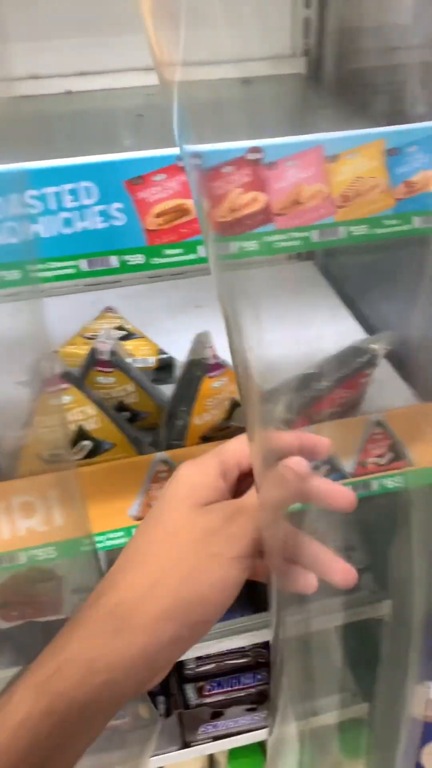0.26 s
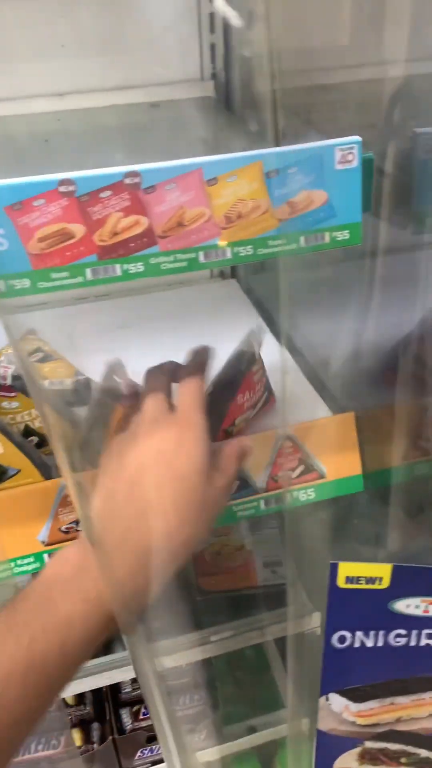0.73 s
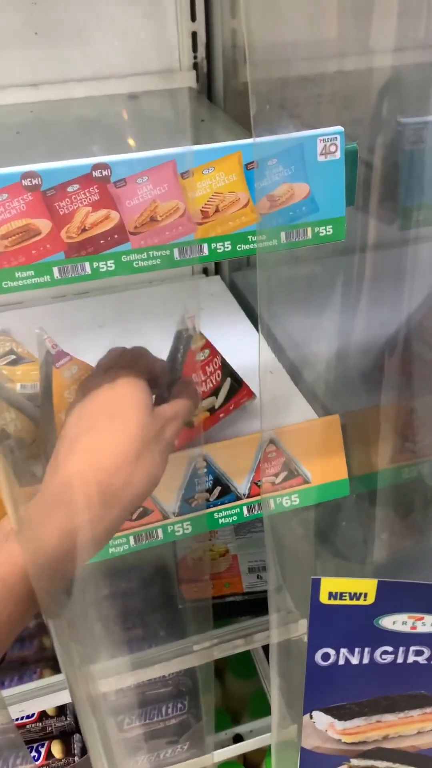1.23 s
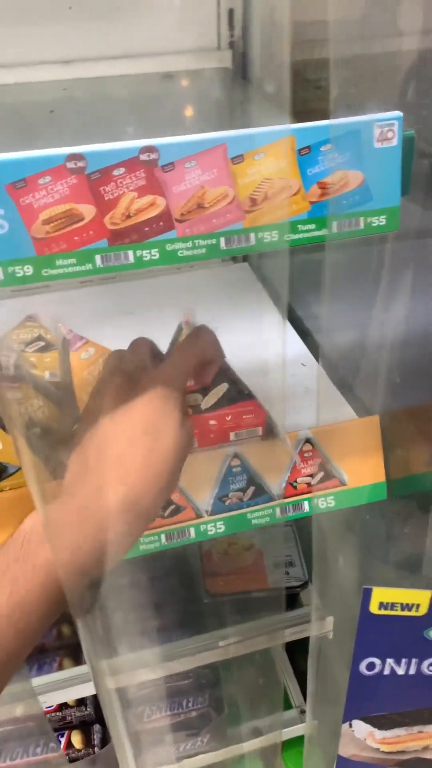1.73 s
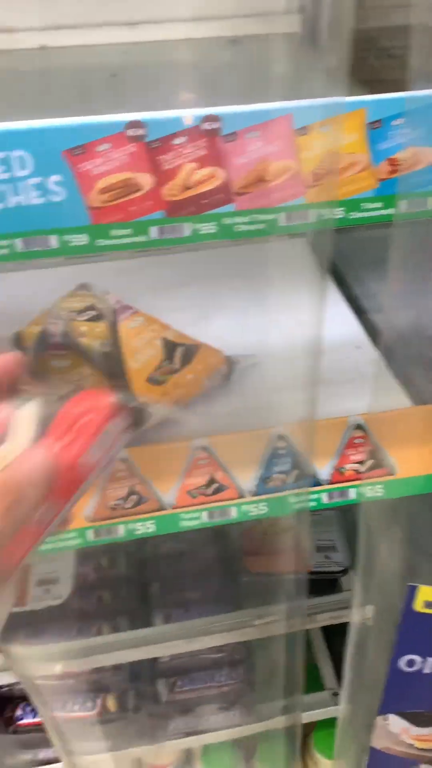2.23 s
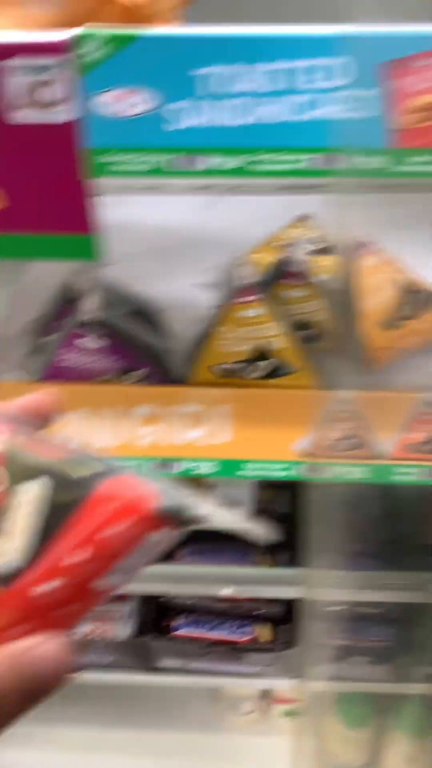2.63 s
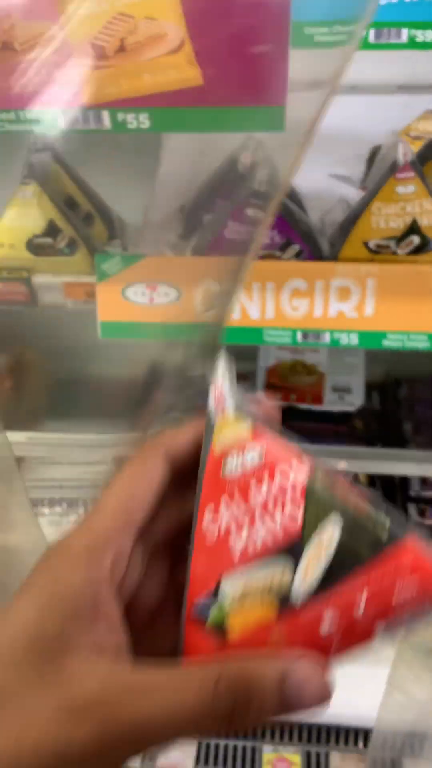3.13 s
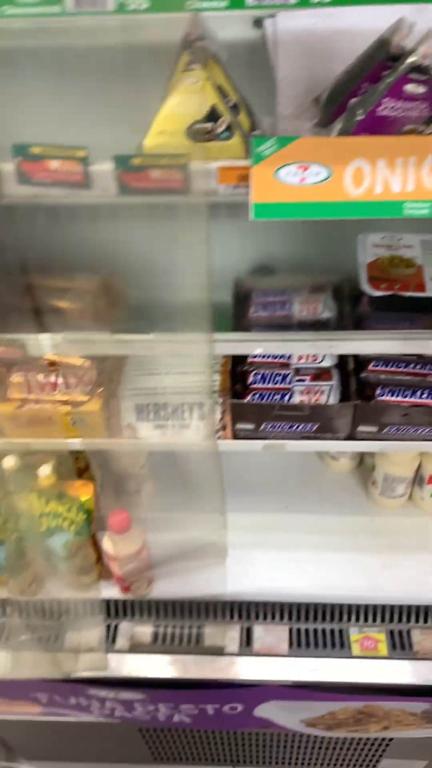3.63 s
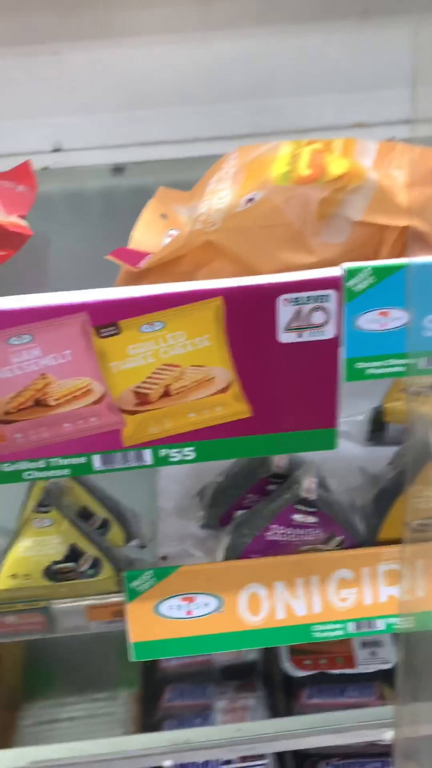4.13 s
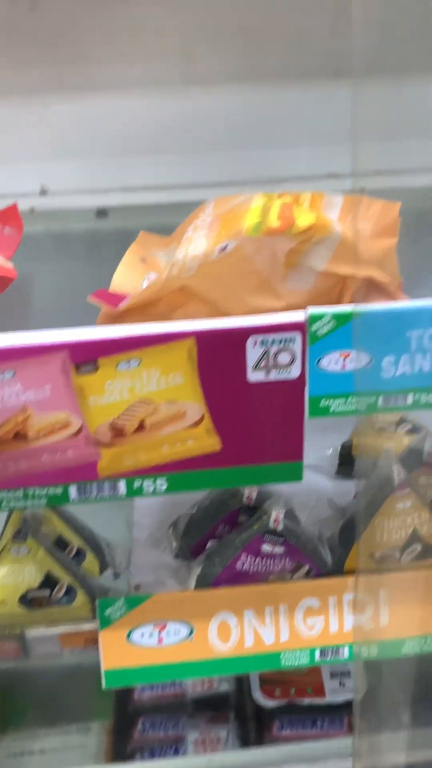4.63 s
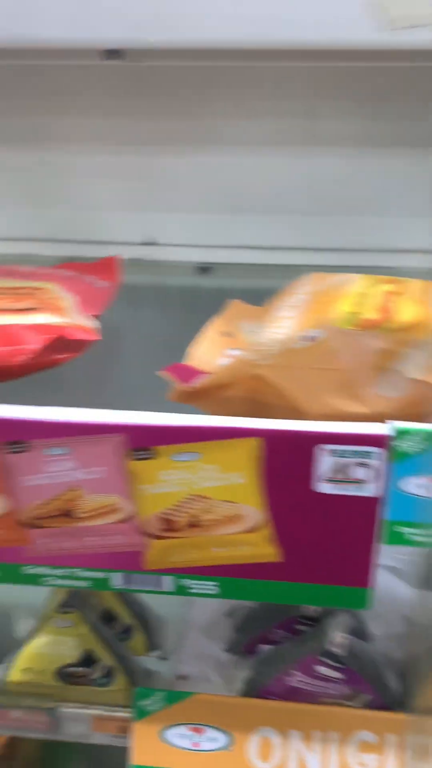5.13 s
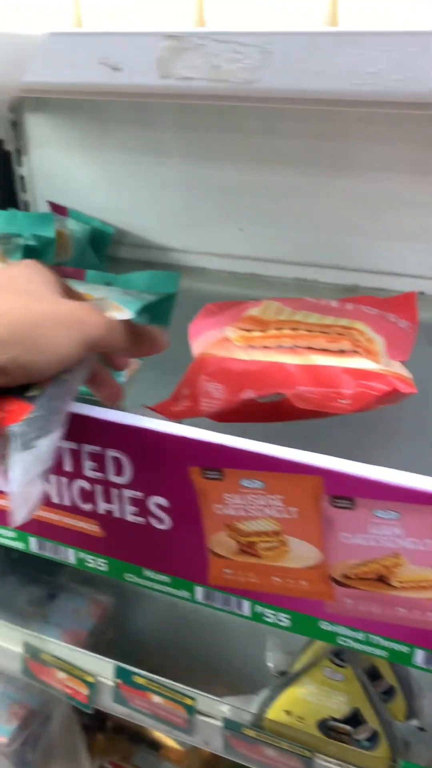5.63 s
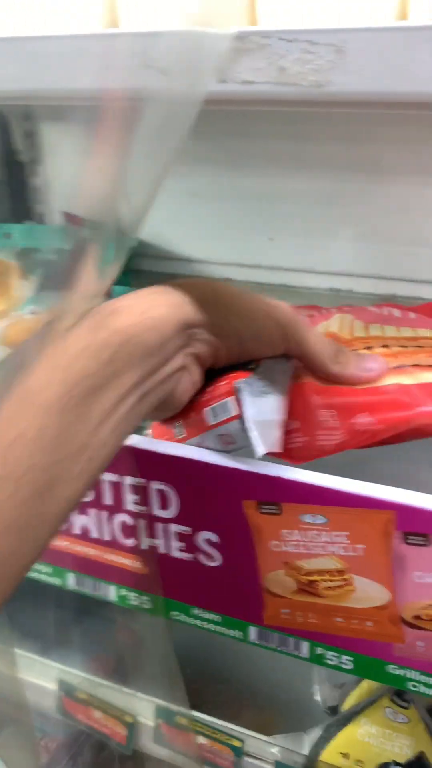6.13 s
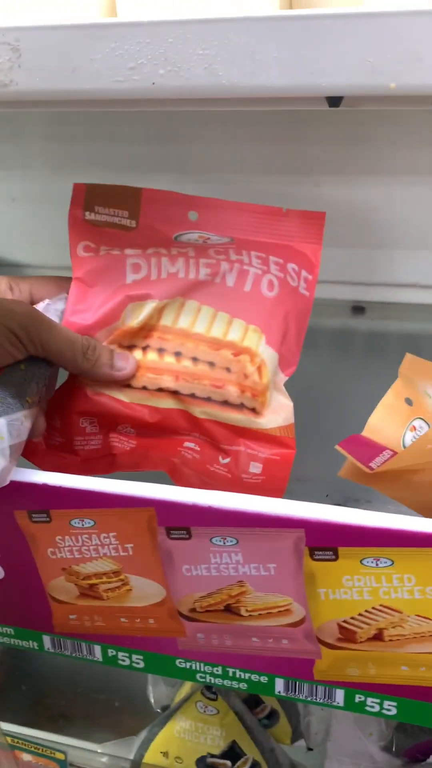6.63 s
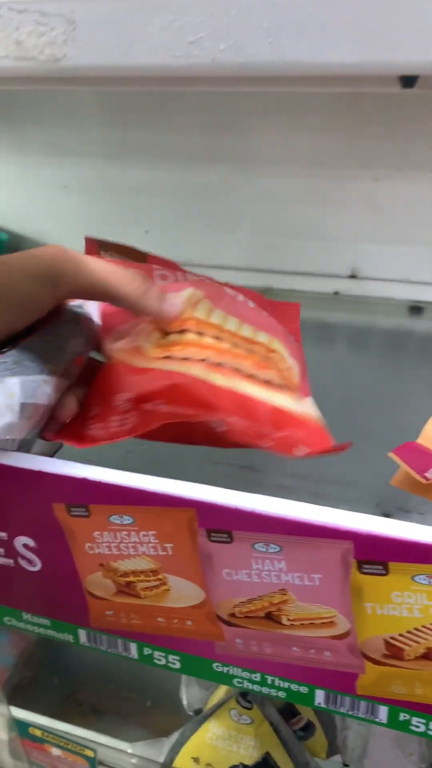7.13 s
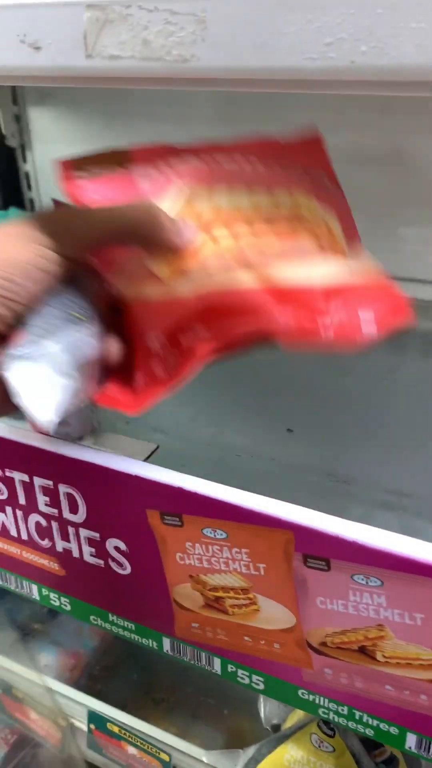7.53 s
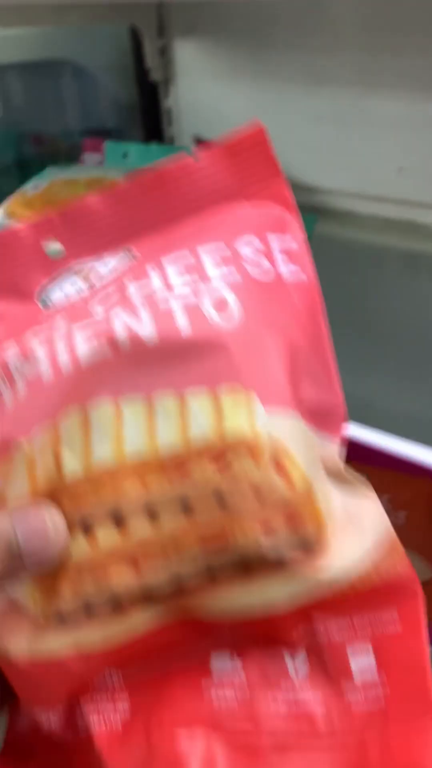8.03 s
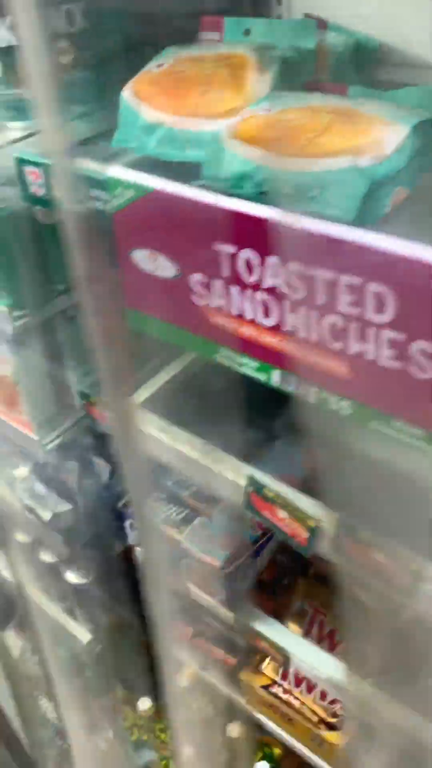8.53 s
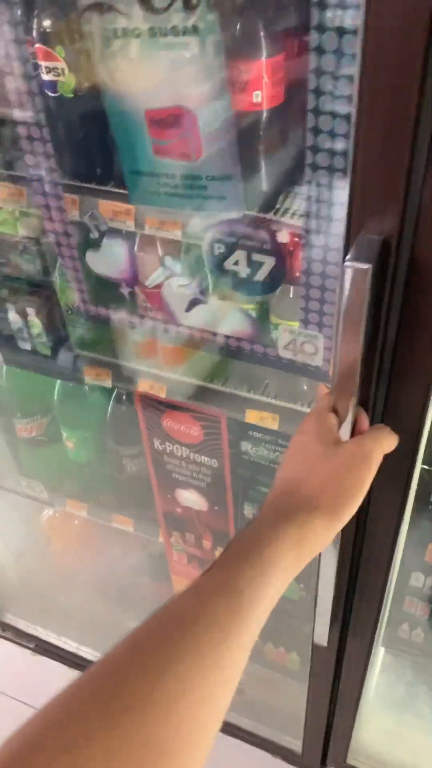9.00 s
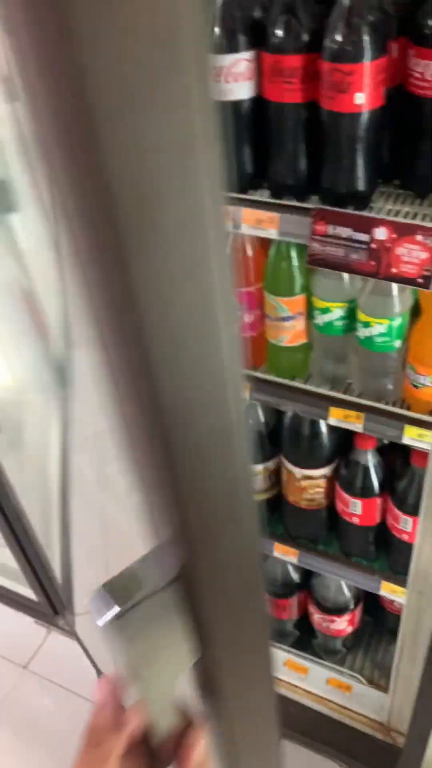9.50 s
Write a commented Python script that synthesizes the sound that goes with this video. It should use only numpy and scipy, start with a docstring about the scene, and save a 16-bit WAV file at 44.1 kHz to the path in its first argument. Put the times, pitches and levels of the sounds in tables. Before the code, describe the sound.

Plastic food packaging rustles and crackles in a hand over the steady fan noise and low hum of refrigerated shop displays.

```python
"""Open display coolers in a shop: fans rush, compressors hum at twice the mains, a faint whine above.
A hand reaches through a curtain of plastic strips and picks up film-wrapped food. The film rustles
and snaps, packs knock the shelf, and small metal parts jingle now and then. The listener starts at
a low shelf, jumps to the top shelf, then to a quieter glass-door fridge; short, dull clicks sound
at the jumps."""
import sys
import numpy as np
from scipy import signal
from scipy.fft import rfft, irfft, next_fast_len
from scipy.io import wavfile
from scipy.ndimage import uniform_filter1d

SR = 44100
rng = np.random.default_rng(int(sys.argv[2]) if len(sys.argv) > 2 else 0)


def materialize(psi):
    """Save the field psi as 16-bit PCM at rate SR to the path in sys.argv[1].

    A 1-D psi becomes a single channel; in a 2-D psi each row is a channel.
    """
    bounded = np.clip(np.atleast_2d(psi).T, -1, 1)
    quanta = np.round(bounded * 32767).astype(np.int16)
    wavfile.write(sys.argv[1], SR, quanta)


N = 430416
FRIDGE_S = 8.69  # when the listener jumps to the fridge


def fans():
    """Fans push air: it rushes, makes the hollow case boom, and hisses across the open front."""
    # The fans at the low shelf, the top shelf and the fridge, whose door swings open.
    # Each row: time in seconds, then the levels of rush, boom and hiss in dB.
    fan_levels = [(0, -27, -34.5, -50), (2.5, -26.5, -30, -58), (4.14, -26.5, -33.5, -50),
                  (4.16, -25.5, -32.5, -59), (5.3, -25.5, -32.5, -53), (6.2, -25.5, -32, -58),
                  (8.1, -25.5, -24.5, -60), (8.68, -25.5, -35.5, -66), (8.7, -33.5, -32.5, -55),
                  (8.95, -33.5, -36, -52.5), (9.25, -32, -39.5, -59), (9.55, -29.5, -38, -73),
                  (9.76, -31, -41, -69)]
    # The tone colour of each noise. Each row: frequency in Hz, relative strength in dB.
    cooler_air = [(18, -55), (33, -30), (42, -14.5), (52, -11), (75, -13.5), (103, -7.5), (119, -4.5),
                  (135, -9), (152, -22), (183, -11), (221, -13), (333, -13.5), (593, -24), (699, -24),
                  (932, -28.5), (1410, -31), (4100, -47), (5330, -100), (9020, -120)]
    fridge_air = [(18, -38), (30, -28), (59, 0.5), (86, -17), (114, -10), (150, -12.5), (195, -12),
                  (215, -13), (235, -9.5), (266, -9.5), (377, -14.5), (482, -15), (657, -23.5), (1590, -31),
                  (1730, -30), (2080, -33), (3900, -41.5), (4300, -46), (5300, -42.5), (6900, -48),
                  (7600, -67), (9020, -90)]
    case_boom = [(60, -27), (85, -6), (105, 7), (118, 8.5), (132, -6.5), (150, -23), (190, -36.5)]
    air_hiss = [(1500, -15), (3500, 16), (7500, 8), (8200, -18), (12000, -18), (15500, 5)]
    rush_db, boom_db, hiss_db = curves(fan_levels)
    at_fridge = np.clip((np.arange(N) / SR - FRIDGE_S) / 0.011, 0, 1)
    rush = (1 - at_fridge) * noise(cooler_air, patchy_db=1.39)
    rush += at_fridge * noise(fridge_air, patchy_db=1.0)
    boom = noise(case_boom, patchy_db=1.4, size=4096)
    hiss = noise(air_hiss, patchy_db=4.0, size=512)
    return amp(rush_db) * rush + amp(boom_db) * boom + amp(hiss_db) * hiss


def motors():
    """Motors and lamps hum and whine in steady tones that waver a little in level and pitch."""
    # Each row is a tone: start and end in seconds, pitch in Hz, level in dB, waver in dB.
    tones = [(0, 4.15, 118.6, -28.5, 2.2), (4.15, 8.69, 118.8, -24.5, 2), (8.69, 10, 118.4, -41, 2.5),
             (0, 8.69, 133, -37, 3), (0, 8.69, 108.8, -35, 3), (0, 4.15, 328.4, -43, 2),
             (4.15, 5.6, 188.4, -35, .8), (4.15, 5.4, 376.8, -41, 1.2), (4.15, 5.4, 329, -39, 2.5),
             (0, 4.15, 1970, -58, 2.5), (0, .45, 3940, -57, 1.5), (.45, 3.7, 3940, -64, 3.5),
             (4.15, 5.4, 466, -46, 1.5), (8.69, 10, 59.2, -40, 2), (8.69, 10, 236.9, -39, .7),
             (8.69, 10, 479, -50, 1.5), (8.69, 10, 1685, -55.5, 1), (8.69, 10, 6562, -71, 2),
             (8.69, 10, 113, -40, 2)]
    waver_hz_per_db = 0.6
    t, out = np.arange(N) / SR, np.zeros(N)
    for start, end, hz, db, waver_db in tones:
        on = np.clip(np.minimum(t - start, end - t) / 0.0066 + .5, 0, 1)
        cycles = np.cumsum(hz + waver_hz_per_db * waver_db * wander(24.92)) / SR + rng.random()
        level = amp(db + waver_db * wander(18.0))
        out += on * level * np.sqrt(2) * np.sin(2 * np.pi * cycles)
    return out


def rustle():
    """The film ticks up high; the whole bag answers with a denser, softer body and two hollow rings."""
    film = creases(per_s=1100, spread_db=4.2, echo_s=0.03, echo_db=5.0)
    bag = creases(per_s=2200, spread_db=4.0, echo_s=0.031, echo_db=7.0)
    body = band(bag, 770, 4570) + amp(-7.5) * band(bag, 1460, 2050) + amp(-17.5) * band(bag, 2970, 4000)
    bands = [body, band(film, 5440, 9300), band(film, 8450, 24700)]
    return sum(gain * evened(part) for gain, part in zip(squeezing(), bands))


def squeezing():
    """Each squeeze swells fast and dies slowly. Gives the gains of the low, middle and high rustle."""
    # Each row: start in seconds, length in seconds, strength in dB, the body's offset from that in dB.
    squeezes = [(0, 0.13, -53, 6), (0.475, 0.074, -41.5, 10.5), (0.5, 0.37, -42.5, -2),
                (0.746, 0.25, -47.5, -3), (0.965, 0.088, -56, -3), (1.02, 0.63, -47, -3),
                (1.531, 0.13, -43.5, 5), (1.627, 0.29, -47, -19), (1.805, 0.28, -49, -19),
                (2.148, 0.42, -52.5, -8), (2.613, 0.12, -60, -4), (2.827, 0.066, -55, 0),
                (2.995, 0.18, -52, -6), (3.377, 0.35, -60, 8), (5.032, 0.072, -50, 8),
                (5.507, 0.078, -39.5, -0.5), (5.808, 0.29, -34.5, -3.5), (5.973, 0.26, -41.5, 3),
                (6.141, 0.24, -36.5, -1), (6.312, 0.091, -47, 7), (6.414, 0.11, -43, -2),
                (6.717, 0.21, -47.5, -2.5), (6.816, 0.2, -42, 1), (6.993, 0.45, -48.5, 2.5),
                (7.22, 0.53, -49, 0), (7.498, 0.28, -35, 2.5), (7.708, 0.26, -50, 6), (7.865, 0.08, -59, 5),
                (8.047, 0.16, -44.5, -4), (8.118, 0.16, -41.5, 6), (8.298, 0.15, -46, -9),
                (8.552, 0.24, -53, 8)]
    rise_share = 0.27
    at_cooler = np.arange(N) < FRIDGE_S * SR
    level, body = amp(-53.5) * at_cooler, amp(-49.5) * at_cooler  # the film stirs between squeezes
    for start, length, db, body_db in squeezes:
        progress = np.arange(0, 1, 1 / (length * SR))
        ramp = np.minimum(progress / rise_share, (1 - progress) / (1 - rise_share))
        arch = np.sin(np.pi / 2 * ramp) ** 2
        add(level, start, amp(db) * arch)
        add(body, start, amp(db + body_db) * arch)
    brightness = (level / amp(-33.5)) ** 0.54  # a harder squeeze is brighter
    return body, amp(-6) * level, amp(11.5) * level * brightness


def creases(per_s, spread_db, echo_s, echo_db, count=6):
    """Tiny creases tick in random clumps; the shelf box smears each with one of several echoes."""
    sizes = amp(spread_db * np.minimum(rng.exponential(1, N), 4))
    ticks = sizes * (rng.random(N) < per_s / SR)
    ticks = ticks * rng.choice([-1., 1.], N) * amp(3.07 * wander(40.0))
    t, echo_choice = np.arange(4096) / SR, rng.integers(0, count, N)
    tails = rng.standard_normal((count, 3, len(t))) * amp(-60 * t / echo_s)
    # Left and right hear almost the same echo.
    tails = (tails[:, :1] + 0.022 * tails[:, 1:]) / np.linalg.norm(tails[0, 0])
    echoes = sum(signal.oaconvolve((ticks * (echo_choice == k))[None], tail, axes=1)[:, :N]
                 for k, tail in enumerate(tails))
    return ticks + amp(echo_db) * echoes


def snaps_and_clicks():
    """Ticks with noisy tails: most are film creases buckling, with aftershocks and shelf echoes."""
    # Each row: time in seconds, level in dB, pitch in Hz, then bright tail and body in relative dB.
    # The rows at 4.154, 8.680 and 8.702 s are short, dull clicks as the listener jumps
    # to the top shelf and to the fridge; the others are the film.
    ticks = [(0.2911, -32, 9600.0, -18, -23.0), (0.3616, -32, 9000.0, -13, -25.0),
             (0.4885, -15, 14200, -8, -6), (0.7717, -29, 15000.0, -13, -25.0),
             (0.794, -20.5, 14800.0, -9, -14), (0.856, -27, 13200.0, -7, -14),
             (0.9777, -31, 14100.0, -7, -16), (1.0325, -19, 15000.0, -10.0, -18),
             (1.462, -30, 13100.0, -9, -22.0), (1.5612, -13.5, 14400.0, -5.5, -30.0),
             (1.696, -22, 14500.0, -8, -30), (1.7341, -34, 13800.0, -2, -24.0),
             (1.7411, -33, 13600.0, -17.0, -26.0), (1.9004, -36, 9500.0, -11, -22),
             (2.023, -25.5, 11300.0, -10, -23), (2.2163, -27, 13800.0, -13.0, -21.0),
             (2.2512, -30, 12100.0, -8, -20), (2.2599, -16, 14900.0, -23, -27),
             (2.369, -25, 9900.0, -12, -28), (2.5598, -31, 11100.0, -7, -12),
             (2.6377, -25, 10100.0, -8, -14), (2.6607, -23, 9300, -13.0, -31),
             (2.8611, -28, 12200.0, -15, -22), (2.888, -19, 14500.0, -16, -26.0),
             (2.952, -22, 14400.0, -21, -25.0), (3.1521, -32, 11600.0, -6.0, -23.0),
             (3.161, -25, 15000.0, -20.0, -19), (3.176, -32, 12100.0, -20.0, -12),
             (3.233, -26.0, 13300.0, -21, -17), (3.4355, -16, 14600.0, -13, -37),
             (3.462, -27, 14500.0, -8, -18), (3.4754, -21.5, 14300.0, -9, -7),
             (3.5517, -29, 15000.0, -16.0, -18.0), (3.5896, -27, 15200.0, -10, -13),
             (3.6108, -25, 9400.0, -14, -16), (4.154, -32, 5960, -20, -6), (5.051, -27, 13800.0, -10, -20),
             (5.522, -26, 14000.0, -3.0, -23), (5.541, -24, 12700.0, -20, -32),
             (5.807, -21, 15000.0, -9, -16), (5.8348, -26, 14500.0, -12, -24),
             (5.8616, -35, 12100.0, -12, -20.0), (5.9135, -22, 12200.0, -18, -32.0),
             (5.9363, -15, 14900.0, -16, -31), (5.9701, -20.5, 14700.0, -2.5, -31.0),
             (6.0158, -19, 10600.0, -9, -29.0), (6.0305, -16, 11000, -10.5, -35.0),
             (6.0364, -10.5, 11700, -10, -33), (6.0453, -15, 12500.0, -10, -34.0),
             (6.057, -9, 11800, -19, -39.0), (6.1157, -17.5, 6300.0, -9, -18),
             (6.135, -17, 6800.0, -9, -16), (6.169, -20, 13100.0, -13, -23),
             (6.1835, -18, 13000.0, -10, -32.0), (6.213, -13, 14000.0, -15, -21),
             (6.2347, -17, 9100.0, -16, -16), (6.2515, -19, 6160, -8, -17),
             (6.2608, -22, 11200.0, -18.0, -8), (6.3384, -8, 12400, -3.5, -16),
             (6.373, -12, 13200.0, -8, -22), (6.392, -7, 12400, -8.5, -18),
             (6.436, -17.5, 14600.0, -7.5, -13), (6.4566, -30, 11400.0, -17.0, -17.0),
             (6.4815, -16, 9900, -14.0, -10.5), (6.4949, -21, 15200.0, -21.0, -26),
             (6.527, -25, 6100.0, -5, -16), (6.5685, -23, 4930, -23, -13), (6.612, -24, 6100.0, -12, -27),
             (6.7343, -35, 5600.0, -3.0, -22), (6.7547, -19.5, 14200.0, -10, -30),
             (6.7966, -24, 9700.0, -6, -13), (6.8103, -20, 13400.0, -10, -22),
             (6.8648, -23, 14200.0, -5, -12), (6.873, -15.5, 9550, -12, -23),
             (6.9091, -25, 7300.0, -12, -9), (6.959, -25, 13400.0, -19.0, -23),
             (7.0163, -24.5, 14900.0, -8, -15), (7.0697, -24, 9700.0, -25, -11),
             (7.1302, -17.5, 12100.0, -7.5, -17), (7.232, -28, 14700.0, -5.0, -22.0),
             (7.2427, -27, 14900.0, -16.0, -27), (7.276, -17.5, 11400.0, -8, -20),
             (7.2989, -25, 11800.0, -8, -27.0), (7.31, -26, 8000, -15, -14), (7.3254, -25, 13200.0, 0, -25),
             (7.3339, -6.5, 7600, -14.5, -42), (7.3738, -22, 11600.0, -5, -22),
             (7.3814, -22.0, 15100.0, -19.0, -21.0), (7.415, -13.5, 12000, -11, -19),
             (7.425, -26, 6000, -15, -7), (7.559, -26, 6800, -10, -25), (7.5754, -14, 13200, -10, -35.0),
             (7.6094, -11, 13400, -15, -24), (7.628, -11, 14900.0, -13, -33.0),
             (7.6524, -12, 15100.0, -12, -18), (7.6817, -20, 14800.0, -18.0, -31.0),
             (7.6956, -28, 14000.0, -19.0, -27.0), (7.7908, -27, 14800.0, -13, -26),
             (7.8851, -19, 6300, -13.5, -11.5), (7.9132, -17, 14600.0, -21, -12),
             (7.9563, -28, 5130, -7, -15), (7.964, -22.5, 12200.0, -8, -7), (8.058, -29, 5300.0, -15, -11),
             (8.18, -24.5, 6000, -6.5, -14), (8.226, -27, 5900.0, -19, -7), (8.258, -17, 6270, -14, -14),
             (8.306, -31, 5400.0, -10, -21.0), (8.3487, -15.5, 15100.0, -12, -32),
             (8.5646, -33, 6500, -12, -8), (8.612, -31, 4000, -18, -7), (8.680, -34, 3500, -22, -12),
             (8.702, -33, 5000, -24, -13)]
    lead_s, tick_s, click_s, fade_s, thud_hz = 0.002, 0.00017, 0.00003, 0.067, 2600
    out, t = np.zeros(N), np.arange(4096) / SR - lead_s  # t is zero at the top of the tick
    pulse = np.exp(-.5 * (t / tick_s) ** 2)
    click = amp(1.5) * np.exp(-.5 * (t / click_s) ** 2) * np.cos(t / click_s)  # the tick's sharp edge
    fade = np.clip(t / tick_s / 4 + 1, 0, 1) * amp(-60 * t / fade_s)
    for s, db, hz, tail_db, body_db in ticks:
        hiss = rng.standard_normal(len(t))
        thud = amp(body_db - 7) * np.cos(2 * np.pi * thud_hz * t)  # in a film snap, the pack jumps
        tick = pulse * (np.cos(2 * np.pi * hz * t) + amp(-12) * hiss + thud) + click
        tail = amp(tail_db) * evened(band(hiss, 0.59 * hz, 2.1 * hz))
        body = amp(body_db) * evened(band(hiss[::-1], 850, 5700))
        add(out, s - lead_s, amp(db) * (tick + fade * (tail + body)))
    return out


def knocks():
    """Packs knock the shelf, which rings under a short slap."""
    # Each row: time in seconds, ring level in dB, ring pitch in Hz, slap level in dB.
    hits = [(5.985, -21.5, 1600, -41), (6.381, -24, 1270, -29), (6.384, -13, 2990, -35),
            (6.499, -19, 218, -44), (6.221, -36, 1110, -28.5), (6.245, -35, 2000, -36),
            (7.545, -34, 2300, -45), (7.579, -34, 1260, -36), (7.61, -29, 1900, -39),
            (7.643, -33, 2300, -36), (7.664, -31, 1240, -42), (7.729, -30, 1300, -28.5),
            (7.758, -23, 59, -38), (8.117, -27, 1400, -42), (8.15, -33, 3500, -40), (8.175, -35, 1800, -31),
            (8.178, -31, 3300, -42), (8.195, -33, 3180, -45), (8.226, -30, 1200, -29.5),
            (8.336, -18, 193, -44)]
    ring_cycles, slap_s = 57, 0.1  # how long each takes to fade by 60 dB
    out, t = np.zeros(N), np.arange(SR // 2) / SR
    rise = 1 - np.exp(-t / 0.00097)
    for s, db, hz, slap_db in hits:
        ring = amp(db - 60 * t * hz / ring_cycles) * np.sin(2 * np.pi * hz * t)
        slap = amp(slap_db - 60 * t / slap_s) * evened(band(rng.standard_normal(len(t)), 610, 1800))
        add(out, s, rise * (ring + slap))
    return out


def strip_curtain():
    """An arm bumps the plastic strips; they drag, which roughens their ring."""
    # Each row is a bump: time in seconds, strength in dB.
    bumps = [(0.489, -25), (0.498, -26), (0.506, -28), (0.731, -29), (0.748, -34), (1.031, -33),
             (1.525, -31), (1.541, -38), (2.27, -31.5)]
    # Each row is a tone of the strips: pitch in Hz, relative level in dB, seconds to fade by 60 dB.
    strip_tones = [(569, 4.5, 0.082), (770, -5, 0.1), (990, 3.5, 0.064), (1330, 0, 0.041), (1600, -8, 0.14),
                   (2203, -5, 0.082), (2600, -12, 0.069), (3180, -24, 0.043)]
    scuff = evened(band(rng.standard_normal(N), 21, 220))
    return (0.59 + 0.53 * scuff) * struck(bumps, strip_tones, vary_db=4.0, rise_s=0.0014)


def jingles():
    """Small metal parts meet and chatter, because they keep touching as they ring."""
    # Each row is a touch: time in seconds, strength in dB.
    touches = [(0.2793, -48), (0.2857, -41), (0.3583, -42), (1.1154, -36), (1.135, -42), (1.898, -40.5),
               (2.6336, -30.5), (2.652, -45)]
    # Each row is a tone of the metal: pitch in Hz, relative level in dB, seconds to fade by 60 dB.
    metal_tones = [(3940, -5, 0.22), (7900, -26, 0.2), (8000, -3, 0.31), (9300, -6, .1), (9530, 0, 0.3),
                   (10700, 3.5, 0.2), (11000, -7, 0.092), (13500, -6, .06)]
    chatter = amp(3.5 * wander(300.0)) * wander(320.0)
    return chatter * struck(touches, metal_tones, vary_db=2.0, rise_s=0.0051)


def struck(hits, tones, vary_db, rise_s):
    """A struck object rings with the same tones each time, in a new random mix."""
    out, t = np.zeros(N), np.arange(SR // 4) / SR
    rise = 1 - np.exp(-t / rise_s)
    for s, db in hits:
        for hz, tone_db, fade_s in tones:
            chance, phase = rng.standard_normal(2)
            level = amp(db + tone_db + vary_db * chance - 60 * t / fade_s)
            add(out, s, rise * level * np.sin(2 * np.pi * hz * t + phase))
    return out


def noise(colour, patchy_db, size=2048):
    """Stereo noise of a given tone colour, with drifting louder and softer patches."""
    # Each row: frequency in Hz, how alike left and right are from 0 to 1.
    likeness = [(200, 0.99), (400, 0.91), (760, 0.23), (1300, 0.49), (2400, 0.2), (3600, 0.068), (4500, 1)]
    hz = np.fft.rfftfreq(size, 1 / SR)
    a, b, c, d, patches = rng.standard_normal((N * 4 // size + 5, len(hz), 5)).T
    patches = evened(uniform_filter1d(uniform_filter1d(patches, size=16, axis=0), size=8, axis=1))
    alike = np.clip(value_at(likeness, hz), 0, 0.995)[:, None]
    left = a + 1j * b
    right = alike * left + np.sqrt(1 - alike ** 2) * (c + 1j * d)
    spectra = np.array([left, right]) * amp(value_at(colour, hz)[:, None] + patchy_db * patches)
    return evened(signal.istft(spectra, nperseg=size, noverlap=size * 3 // 4)[1][:, :N])


def wander(hz):
    """A random wobble of size about 1, made of waves no faster than hz."""
    t = np.arange(0, N + 64, 64) / SR
    rates = np.geomspace(hz / 20, hz, num=20)
    wobble = sum(np.sin(2 * np.pi * (f * t + rng.random())) / np.sqrt(f) for f in rates)
    return np.repeat(evened(wobble), 64)[:N]


def amp(db):
    """Turn decibels into a gain."""
    return 10 ** (np.asarray(db) / 20)


def evened(x):
    """Scale a signal to an average power of 1."""
    return x / np.sqrt(np.mean(x ** 2) + 1e-20)


def value_at(points, hz):
    """Look up a frequency table, gliding between its rows."""
    f, value = np.transpose(points)
    return np.interp(np.log(hz + 1), np.log(f + 1), value)


def add(mix, s, sound):
    """Mix a sound in, starting at s seconds."""
    part = mix[round(s * SR):][:len(sound)]
    part += sound[:len(part)]


def curves(table):
    """Spread a time table's columns over every sample."""
    s, *columns = np.transpose(table)
    return [np.interp(np.arange(N) / SR, s, c) for c in columns]


def band(x, lo_hz, hi_hz):
    """Keep the sound between two frequencies."""
    edges = [lo_hz, min(hi_hz, SR / 2 - 500)]
    return signal.sosfilt(signal.butter(2, edges, "band", fs=SR, output="sos"), x)


def scene():
    """The running coolers and everything the hand stirs, in stereo."""
    brushed = jingles() + strip_curtain()
    return fans() + motors() + rustle() + snaps_and_clicks() + knocks() + brushed


def record(dry):
    """The left microphone is a bit softer, the right hears treble late; both cut the lows and highs."""
    # Each row: frequency in Hz, how far the right side lags in radians.
    right_lag = [(0, 0), (1500, .05), (2600, 1.5), (3600, 1.6), (4650, 3.14), (17500, 21.99)]
    bass_cut_hz, treble_cut_hz = 40, 15750
    size = next_fast_len(N + 256)
    hz, lag = np.transpose(right_lag)
    delay = np.exp(-1j * np.interp(np.fft.rfftfreq(size, 1 / SR), hz, lag))
    right = irfft(rfft(dry[1], size) * delay, size)[:N]
    stereo = np.array([amp(-1.26) * dry[0], amp(-0.92) * right])
    stereo = signal.sosfilt(signal.butter(3, bass_cut_hz, "high", fs=SR, output="sos"), stereo)
    treble_cut = signal.firwin(511, treble_cut_hz, window=("kaiser", 9), fs=SR)
    return signal.oaconvolve(stereo, treble_cut[None], "same")


dry = scene()
out = record(dry)
materialize(out)
```